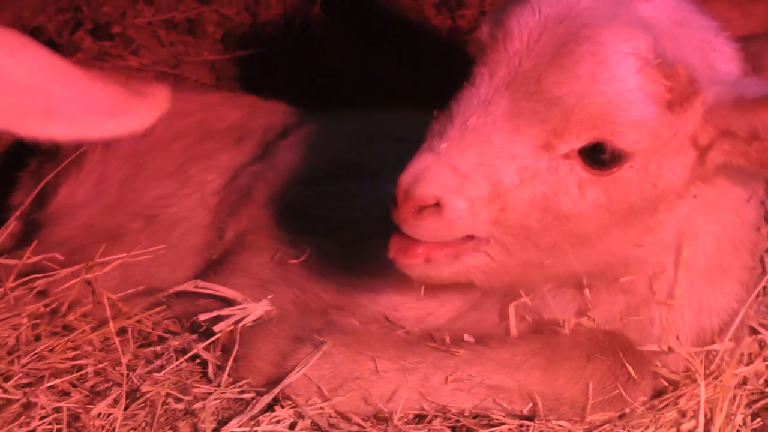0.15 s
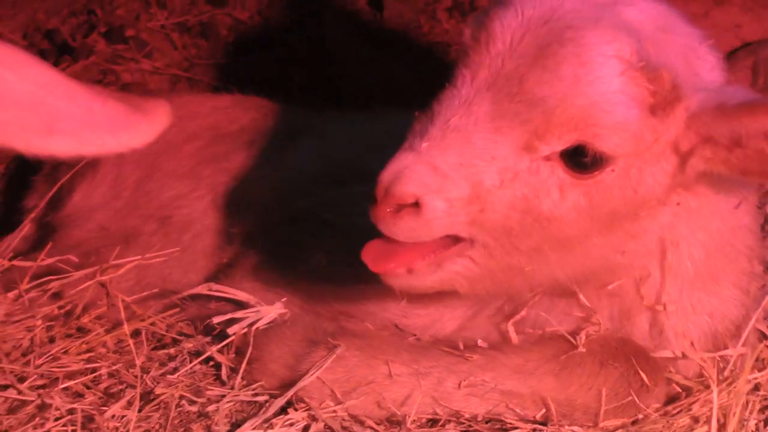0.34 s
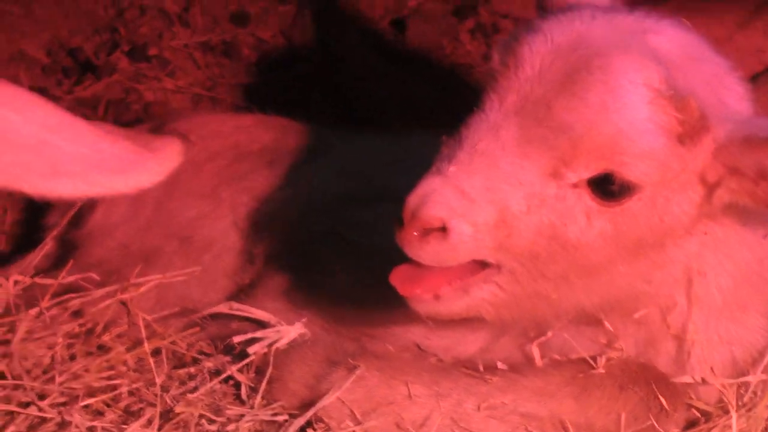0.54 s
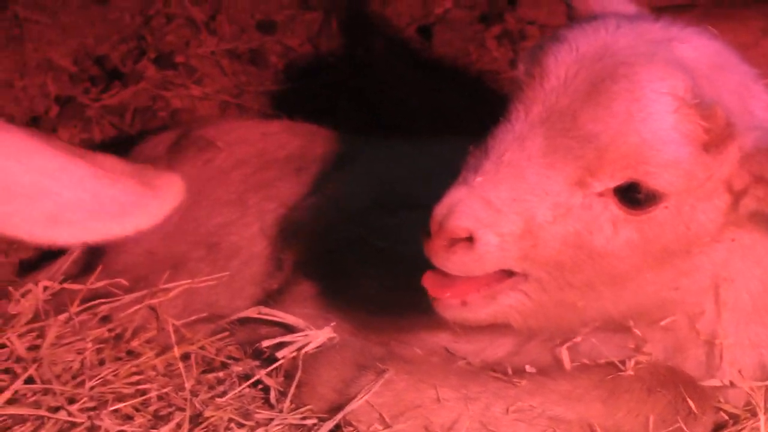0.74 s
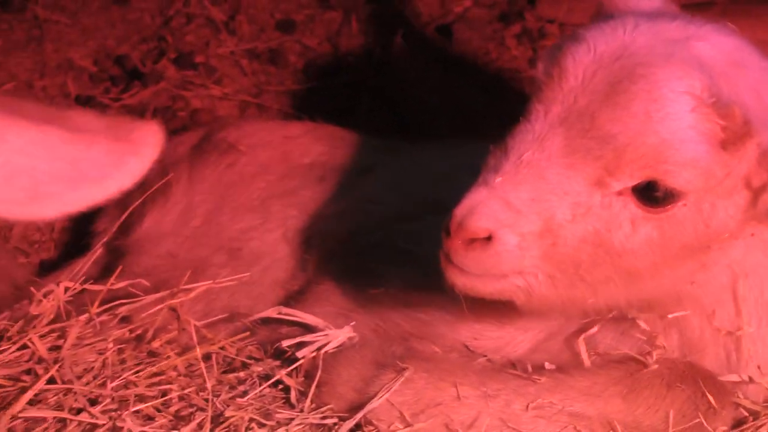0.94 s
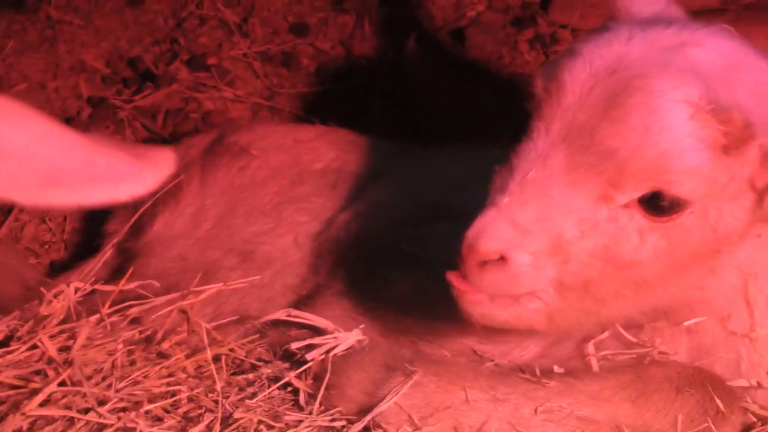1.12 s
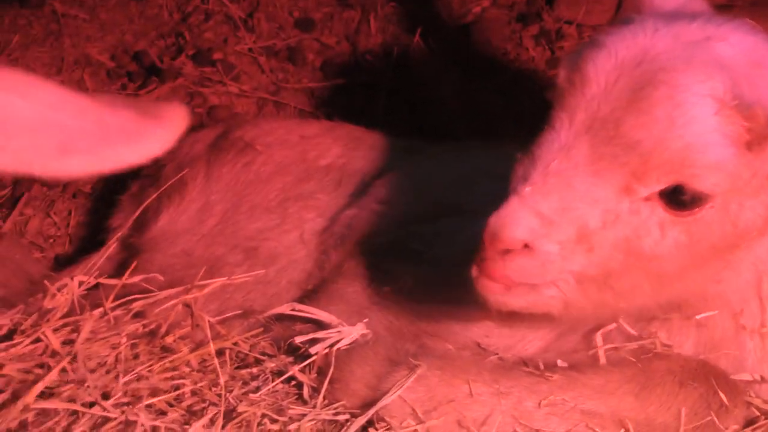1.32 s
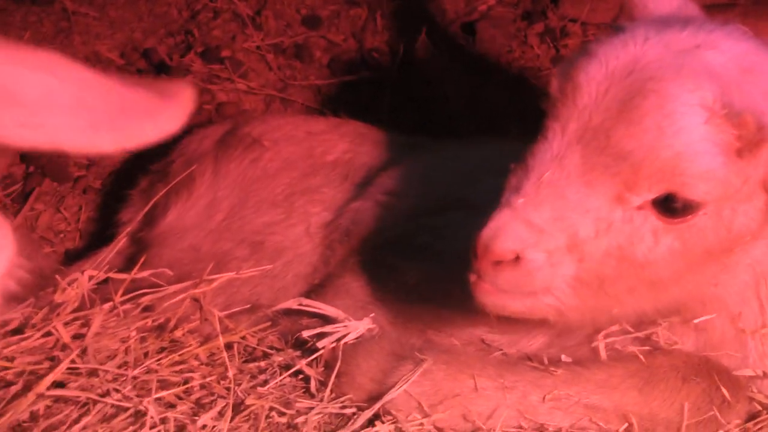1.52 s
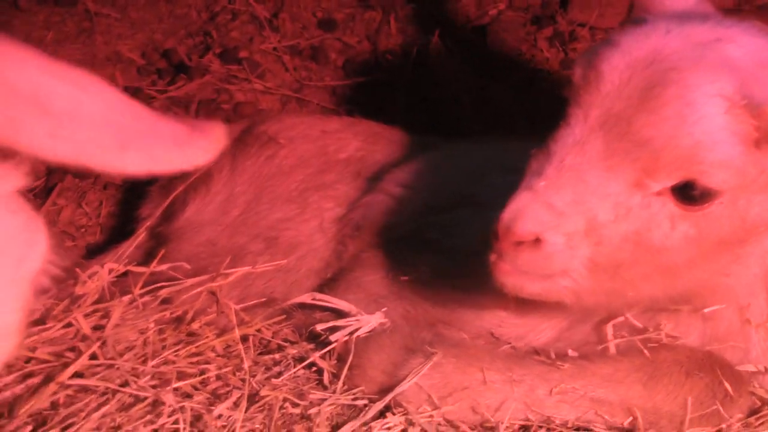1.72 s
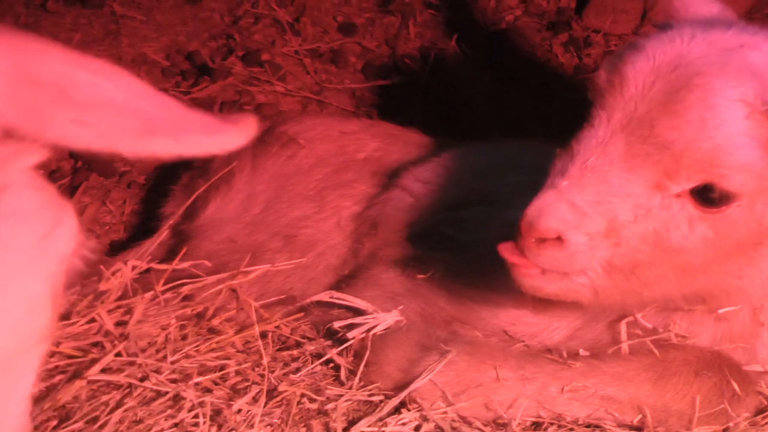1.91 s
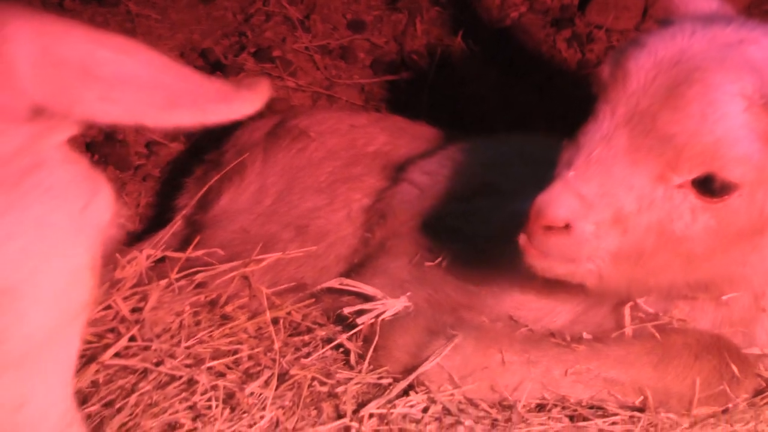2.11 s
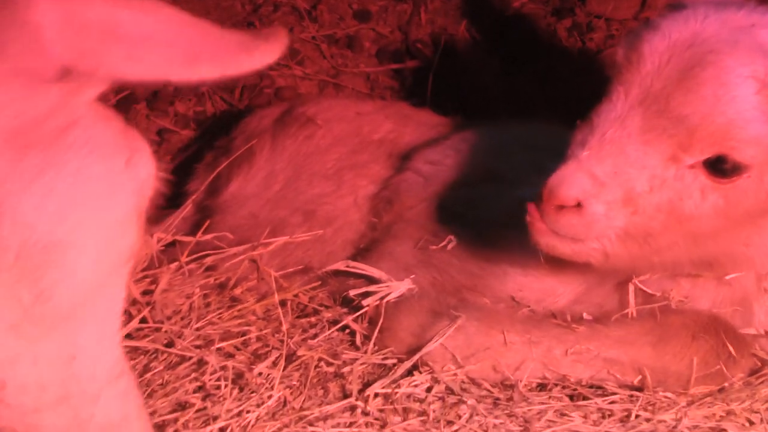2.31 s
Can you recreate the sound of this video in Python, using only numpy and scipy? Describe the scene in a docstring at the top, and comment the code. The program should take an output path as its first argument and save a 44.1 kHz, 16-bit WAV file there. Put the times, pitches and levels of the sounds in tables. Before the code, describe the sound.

Single loud, shaky bleat from a young lamb, with faint straw rustles and snaps afterwards.

```python
"""In a quiet barn, a newborn lamb bleats once, close by, while straw rustles and snaps nearby.
The bleat is sharp vocal pulses and puffs of breath, quavering in pitch and force, that ring a short throat.
Rustles are swells of tiny noisy grains; snaps and dull taps are short bursts ringing one band.
A short scatter of reflections follows them, over a low rumble, a faint whine and the hiss of the room."""
import sys
import numpy as np
from scipy import signal
from scipy.io import wavfile
from scipy.ndimage import uniform_filter1d

SR = 44100
rng = np.random.default_rng(int(sys.argv[2]) if len(sys.argv) > 2 else 0)


def decibels_to_gain(level_db):
    """Convert a level in decibels to a linear amplitude gain (20 dB per decade)."""
    exponent = np.asarray(level_db, float) / 20
    return 10 ** exponent


def wrap_up_sound(samples):
    """Save the sound to the file named by the first command line argument, as 16-bit audio."""
    columns = np.atleast_2d(samples).T
    # keep every value between -1 and 1, then stretch to whole-number steps
    tamed = np.clip(columns, -1, 1)
    steps = np.round(tamed * 32767).astype(np.int16)
    wavfile.write(sys.argv[1], SR, steps)


N = 103635  # length in samples

# Spectrum of the room's rumble and hiss. Each row: frequency in Hz, relative density in dB per Hz.
ROOM_SPECTRUM = [(25, -52), (60, -1), (250, -3), (450, -17.5), (1200, -21), (2900, -13.5), (5000, -16),
                 (9000, -25), (16500, -29.5)]
# Stereo spread of the room. Each row: frequency in Hz, side level minus mid level in dB.
ROOM_SPREAD = [(60, -18.5), (380, 2), (950, -1.5), (2400, -18.5), (15000, -16.5)]
# Faint hum and whine. Each row: frequency in Hz, level in dB, width of the wobble in Hz,
# strength of a steady sine beside the wavering part (as a factor on its peak).
WHINE_TONES = [(125, -70, 10, .8), (403.7, -78, 2, 3.9), (807, -72, 9, 2)]
# Straw rustles. Each row: start in seconds, length in seconds, level in dB before the swell,
# centre in Hz, width in Hz.
STRAW_RUSTLES = [(0.135, 0.048, -64, 2760, 2500), (0.923, 0.2, -64, 4192, 5950),
                 (1.085, .11, -56.5, 4230, 7950), (1.341, 0.13, -60.5, 2460, 810),
                 (1.771, 0.062, -64, 2360, 1500), (1.887, 0.12, -61.5, 3830, 3950),
                 (1.988, 0.066, -58, 3950, 1910)]
# Straw snaps and dull taps. Each row: start in seconds, peak level in dB, frequency in Hz.
STRAW_SNAPS = [(0.153, -44, 3060), (.168, -38.5, 2180), (1.0654, -40, 4930), (1.115, -41, 9000),
               (1.4374, -40, 2800), (1.53, -35, 4700), (1.531, -42, 1770), (1.533, -47, 595),
               (1.807, -46.5, 1940), (1.819, -45, 2880), (1.8367, -44, 2220), (1.902, -43, 4280),
               (2.0635, -41, 4400), (2.126, -50, 2570)]
# Turning points of the quavering pitch. Each row: time in seconds, pitch in Hz.
PITCH_TURNS = [(.225, 294.5), (0.246, 296.1), (0.259, 279.9), (0.3, 316.4), (0.332, 286.6), (0.339, 260.2),
               (0.363, 307.7), (0.378, 301.8), (0.393, 320.5), (0.412, 288.4), (0.433, 309.8),
               (0.445, 299.5), (0.463, 319.2), (0.482, 288.2), (0.496, 303.3), (0.51, 294.8),
               (0.529, 312.3), (0.548, 276.8), (0.566, 297), (0.586, 283.4), (0.601, 303.4), (0.623, 273.3),
               (0.636, 283.1), (0.65, 262.5), (0.673, 296.4), (0.694, 267), (0.711, 294.6), (0.727, 259.2),
               (0.747, 287.3), (.768, 250.1), (0.791, 278.8), (0.809, 261.9), (0.826, 272.6), (.842, 241.5),
               (.862, 252.2), (0.883, 254.3), (0.918, 230)]
# Balance of the voice before the quaver acts. Each row: time in seconds, then levels in dB of
# the plain pulses, throat ring 1, ring 2, ring 3 and the low harmonics.
MOUTH_LEVELS = [(.23, -41.5, -53, -42, -35, -57.5), (.3, -39.5, -52.5, -37.5, -31.5, -57.5),
                (.46, -37.5, -45, -38.5, -30.5, -55.5), (.62, -38.5, -40, -40.5, -33, -54),
                (.75, -40.5, -41.5, -41.5, -39, -52.5), (.84, -42.5, -44.5, -43.5, -53, -49.5),
                (.87, -50.5, -48.5, -44.5, -53, -50.5), (.912, -51.5, -73, -51.5, -55, -53)]
# Spectrum of the vocal pulses. Each row: frequency in Hz, relative level in dB.
PULSE_SPECTRUM = [(300, -38.5), (1000, -14), (1500, 3.5), (2300, 1.5), (3100, 1.5), (5000, 2.5), (6800, -6),
                  (8800, -17), (16000, -44.5)]
# Throat rings. Each row: mid-call frequency in Hz, width in Hz, dB gained on a full beat (and lost
# between beats) at the start, the same at the end, Hz moved over the call.
THROAT_RINGS = [(1650, 300, 1.5, 4.5, 74), (3840, 170, 2, 12, 189), (5370, 150, 2.5, 1.5, -45)]
# Weaker upper rings. Each row: frequency in Hz, width in Hz, level in dB relative to the plain pulses.
UPPER_RINGS = [(6350, 450, -3), (7200, 600, -7), (9600, 900, -31), (12900, 1900, -21), (14700, 1300, -27)]


def evened(x):
    """Scales a sound to rms 1."""
    return x / np.sqrt(np.mean(x ** 2) + 1e-20)


def read(points, hz):
    """Reads a spectrum on a log-frequency axis."""
    f, value = np.transpose(points)
    return np.interp(np.log(hz + 1), np.log(f + 1), value)


def add(mix, s, sound):
    """Lays a sound into the mix at s seconds."""
    part = mix[round(s * SR):][:len(sound)]
    part += sound[:len(part)]


def resonate(x, hz, width):
    """A resonance of gain 1 that may glide: shift down to 0 Hz, smooth, shift back."""
    turn = np.exp(2j * np.pi * np.cumsum(hz * np.ones(len(x))) / SR)
    r = np.exp(-np.pi * abs(width) / SR)
    return 2 * (turn * signal.lfilter([1 - r], [1, -r], x / turn + 1e-18)).real


def colour(x, points, size=2048):
    """Causal (minimum-phase) filter with the given spectrum."""
    log_gain = np.log(decibels_to_gain(read(points, abs(np.fft.fftfreq(size, 1 / SR)))))
    response = np.fft.ifft(np.exp(np.conj(signal.hilbert(log_gain)))).real
    return signal.oaconvolve(x, response)[:len(x)]


def rumble_and_hiss():
    """Mid and side noise shaped frame by frame, with drifting patches and a treble flicker."""
    level_db, patch_db, flicker_db = -61, 1.5, 3
    frames, hz = N // 512 + 5, np.fft.rfftfreq(2048, 1 / SR)
    a, b, c, d, patches = rng.standard_normal((5, len(hz), frames))
    patches = uniform_filter1d(patches, size=40, axis=0)
    patches = evened(uniform_filter1d(patches, size=5, axis=1))
    # the flicker is shared by everything above 1500 Hz
    flicker = flicker_db * (hz[:, None] > 1500) * rng.standard_normal(frames)
    gain = decibels_to_gain(read(ROOM_SPECTRUM, hz)[:, None] + patch_db * patches + flicker)
    spread = decibels_to_gain(read(ROOM_SPREAD, hz))[:, None]
    spectra = np.array([a + 1j * b, (c + 1j * d) * spread]) * gain
    mid, side = signal.istft(spectra, nperseg=2048, noverlap=1536)[1][:, :N]
    return decibels_to_gain(level_db) * np.array([mid, side]) / np.std(mid)


def whine():
    """Narrow lines: noise in two sharp resonances wavers beside a steady sine."""
    total = np.zeros(N)
    for f, db, width, steady in WHINE_TONES:
        noise = rng.standard_normal(N + SR)  # the first second lets the resonances settle
        wavering = evened(resonate(resonate(noise, f, width), f, width)[SR:])
        sine = np.sin(2 * np.pi * f * np.arange(N) / SR)
        total += decibels_to_gain(db) * evened(wavering + steady * sine)
    return total


def room():
    """Rumble, hiss and whine, turned from mid and side into left and right."""
    mid, side = rumble_and_hiss()
    tone = whine()
    mid, side = mid + tone, side + 0.017 * tone
    return np.array([mid + side, mid - side])


def echo(x):
    """A short scatter of reflections from straw and boards, different in each ear."""
    t60_s, density = .12, .05  # density is the chance of a reflection per sample
    t = np.arange(SR // 4) / SR
    hits = rng.standard_normal((2, len(t))) * (rng.random((2, len(t))) < density)
    taps = hits * decibels_to_gain(-60 * t / t60_s) * (t > .001)
    return signal.fftconvolve(x[None], taps / np.linalg.norm(taps[0]), axes=1)[:, :N]


def rustle(length, f, width):
    """A swell of sparse random grains over steady noise, ringing one band."""
    grains_per_s, grain_spread_db, steady = 1800, 3.5, .8
    u = np.arange(round(length * SR)) / round(length * SR)
    chance, size, sign = rng.random((3, len(u)))
    grains = (chance < grains_per_s / SR) * np.sign(sign - .5)
    grains = grains * decibels_to_gain(-grain_spread_db * np.log(np.maximum(size, .03)))  # a few are much louder
    noise = np.diff(evened(grains) + steady * evened(sign - .5), prepend=0)  # brightened
    swell = np.sin(np.pi * u ** 0.65)
    return swell * evened(resonate(resonate(noise, f, width), f, 2 * width))


def snap(f):
    """A click and a fast-dying noise burst ring one band; the peak is 1."""
    width, t60_s = .5 * f, .012
    t = np.arange(SR // 20) / SR
    burst = (rng.standard_normal(len(t)) * 0.58 + (t == 0) * 3) * decibels_to_gain(-60 * t / t60_s)
    burst = resonate(resonate(burst, f, width), f, 2 * width)
    return burst / abs(burst).max()


def straw():
    """All rustles, snaps and dull taps, each laid in at its own time and level."""
    mix = np.zeros(N)
    for start, length, db, f, width in STRAW_RUSTLES:
        add(mix, start, decibels_to_gain(db) * rustle(length, f, width))
    for s, db, f in STRAW_SNAPS:
        add(mix, s, decibels_to_gain(db) * snap(f))
    return mix


def quavering_pitch(t):
    """Pitch in Hz, easing into each turning point, and its distance in Hz from a short running mean."""
    s, pitch = np.transpose(PITCH_TURNS)
    turn = np.arange(len(s))
    step = np.interp(t, s, turn)
    hz = np.interp(step - np.sin(2 * np.pi * step) / (4 * np.pi), turn, pitch)
    return hz, hz - uniform_filter1d(hz, round(.04 * SR), mode="nearest")


def vocal_folds(since, hz, quaver, u, drift, force_db_per_hz):
    """Pulses of 63 equal harmonics with jitter and shimmer, and a puff of breath in each cycle."""
    jitter, shimmer, puff_cycles, breath_db, breath_rise_db = .008, .05, .6, -9, 4
    b, c = rng.standard_normal((2, len(hz)))
    unsteady = jitter * (1 + 2 * np.exp(-since / .04))  # shakier at the onset
    turns = np.cumsum(hz * (1 + unsteady * evened(uniform_filter1d(drift, size=150)))) / SR
    folds = evened(sum(np.cos(2 * np.pi * k * turns) for k in range(1, 64)))
    folds = folds * (1 + shimmer * evened(uniform_filter1d(b, size=150)))
    # breath grows as the call tires, and gives way to the pulses on each beat
    breath = decibels_to_gain(breath_db + breath_rise_db * u - 2 * force_db_per_hz * quaver)
    puffs = np.exp(-(turns % 1) / puff_cycles) * np.diff(c, prepend=0)
    return folds, breath * evened(puffs)


def upper_rings(pulses, airy, quaver):
    """Weak treble resonances; the lowest two swell with the quaver and the second also rides up."""
    swing_hz_per_hz, swing_db_per_hz = 24.8, 0.074
    steady, swinging = 0, 0
    for f, width, db in UPPER_RINGS[2:]:
        steady = steady + decibels_to_gain(db) * evened(resonate(resonate(airy, f, width), f, 2 * width))
    for k, (f, width, db) in enumerate(UPPER_RINGS[:2]):
        swinging = swinging + decibels_to_gain(db) * evened(resonate(pulses, f + k * swing_hz_per_hz * quaver, width))
    return steady + decibels_to_gain(swing_db_per_hz * quaver) * swinging


def throat(pulses, levels, quaver, u):
    """Three gliding resonances that gain on each beat of the quaver."""
    beat = np.tanh(quaver / 6)  # 6 Hz up already counts as most of a beat
    out = 0
    for level, (f, width, first, last, move) in zip(levels, THROAT_RINGS):
        gain = level * decibels_to_gain((first + (last - first) * u) * beat)
        out = out + gain * evened(resonate(pulses, f + move * (u - .5), width))
    return out


def closing_mouth(voice, pulses, t, u):
    """As the mouth shuts a ring appears; a hollow that deepens through the call becomes full."""
    close_s, ring_hz, ring_width_hz, ring_db = 0.808, 2230, 580, -47.5
    shut = 1 / (1 + np.exp((close_s - t) * 200))
    voice = voice + decibels_to_gain(ring_db) * evened(resonate(pulses, ring_hz, ring_width_hz)) * shut
    return voice - np.maximum(shut, u ** 2) * resonate(voice, 3050, 800)  # centre Hz, width Hz


def treble_hollow(voice, quaver, drift):
    """Takes a notch out of the treble that shifts against the quaver and wanders."""
    centre_hz, width_hz, hz_per_hz, wander_hz = 7300, 900, -30, 350
    wander = wander_hz * evened(uniform_filter1d(drift, size=700))
    return voice - resonate(voice, centre_hz + hz_per_hz * quaver + wander, width_hz)


def bleat():
    """Pulses and breath drive the throat and mouth; force quavers with the pitch."""
    force_db_per_hz, low_hz, low_width_hz = 0.1028, 770, 910
    start, end = PITCH_TURNS[0][0], PITCH_TURNS[-1][0]
    t = np.arange(start, end + .03, 1 / SR)
    u = (t - t[0]) / (t[-1] - t[0])  # progress through the call, 0 to 1
    hz, quaver = quavering_pitch(t)
    drift = rng.standard_normal(len(t))  # moves both the pitch jitter and the treble hollow
    folds, breath = vocal_folds(t - start, hz, quaver, u, drift, force_db_per_hz)
    gate = np.minimum((t - start) / .002, 1) * np.clip((end - t) / .008, 0, 1)
    drive = (folds + breath) * gate
    airy = (.4 * folds + breath) * gate  # less pulse in the highest rings

    times, *columns = np.transpose(MOUTH_LEVELS)
    plain, *rings, low = (decibels_to_gain(np.interp(t, times, column)) for column in columns)
    pulses = colour(drive, PULSE_SPECTRUM)
    voice = plain * (evened(pulses) + upper_rings(pulses, airy, quaver))
    low_harmonics = resonate(resonate(drive, low_hz, low_width_hz), low_hz, low_width_hz)
    voice = (voice + low * evened(low_harmonics)) * decibels_to_gain(force_db_per_hz * quaver)
    voice = voice + throat(pulses, rings, quaver, u)
    voice = closing_mouth(voice, pulses, t, u)
    voice = treble_hollow(voice, quaver, drift)
    mix = np.zeros(N)
    add(mix, start, voice)
    return mix


def scene():
    """Lamb and straw in the centre with their reflections, in the barn."""
    near = bleat() + straw()
    return near + decibels_to_gain(-17) * echo(near) + room()


def band_limit(x):
    """A steep low-pass at the top of the band."""
    return signal.sosfilt(signal.butter(12, 16750, fs=SR, output="sos"), x)


def record(dry):
    """Ends the treble steeply at 16720 Hz to give the finished mix."""
    lowpass = signal.firwin(511, 16720, window="blackman", fs=SR)
    finished = signal.oaconvolve(dry, lowpass[None], "same")
    return band_limit(finished)


dry = scene()
out = record(dry)
wrap_up_sound(out)
```